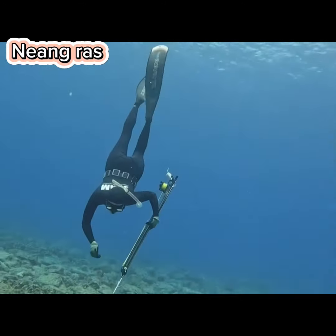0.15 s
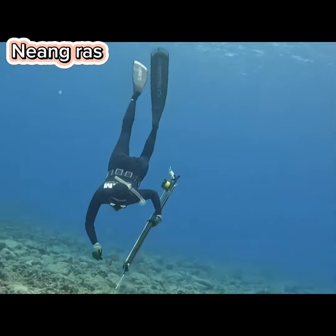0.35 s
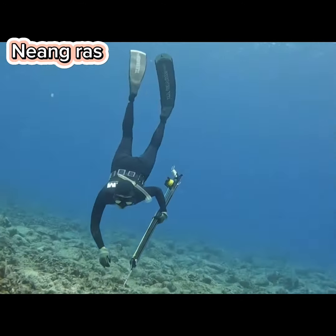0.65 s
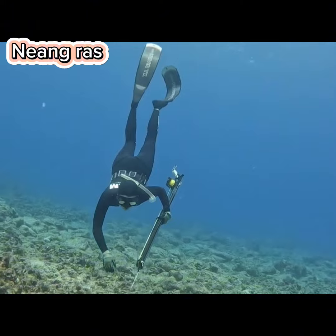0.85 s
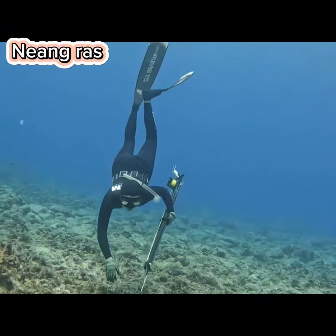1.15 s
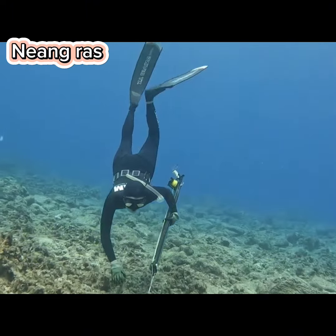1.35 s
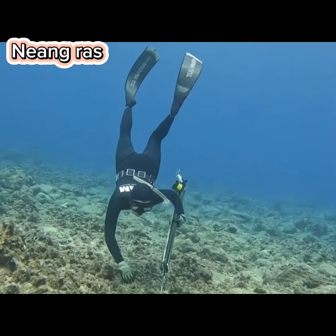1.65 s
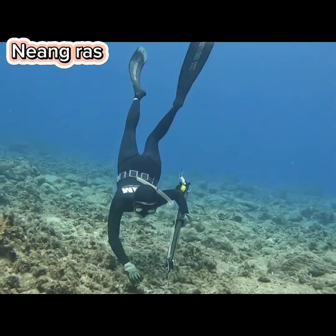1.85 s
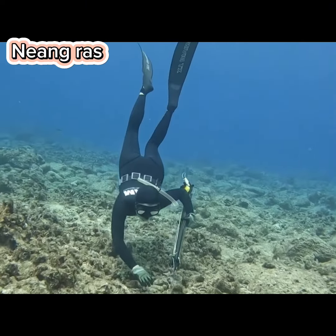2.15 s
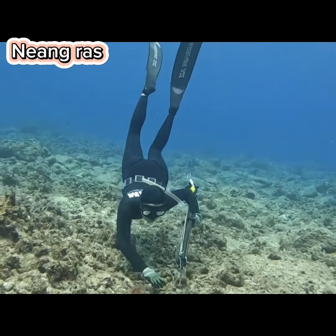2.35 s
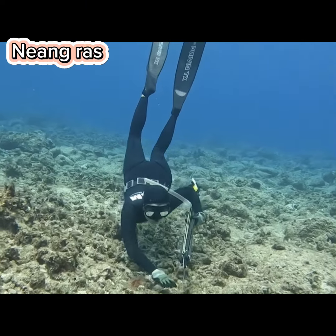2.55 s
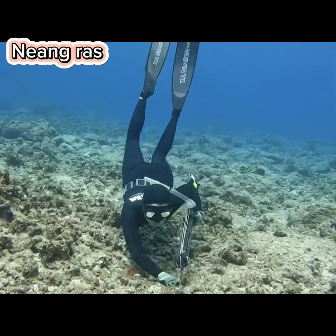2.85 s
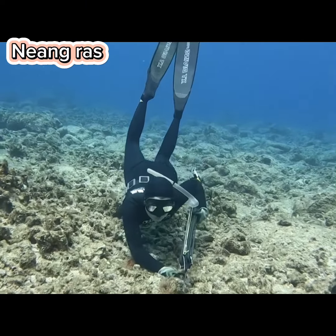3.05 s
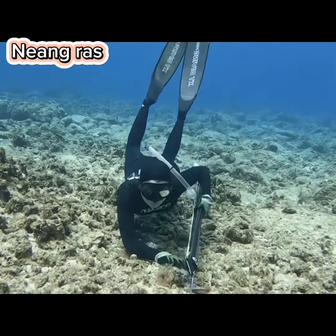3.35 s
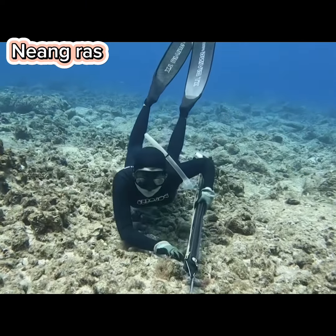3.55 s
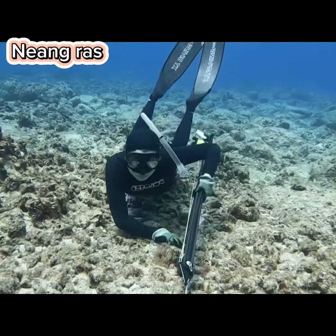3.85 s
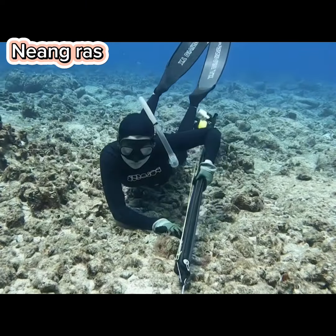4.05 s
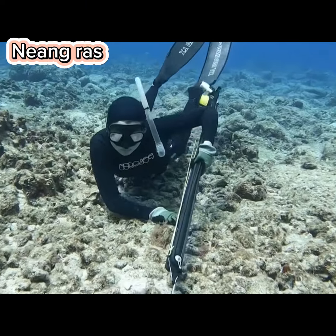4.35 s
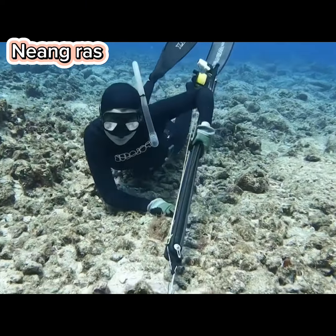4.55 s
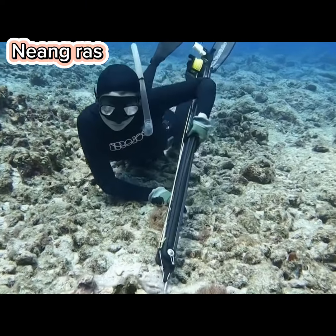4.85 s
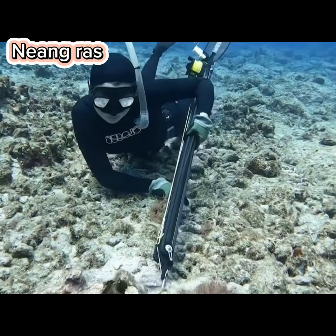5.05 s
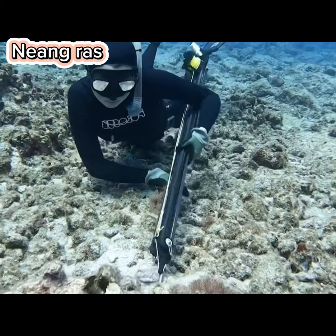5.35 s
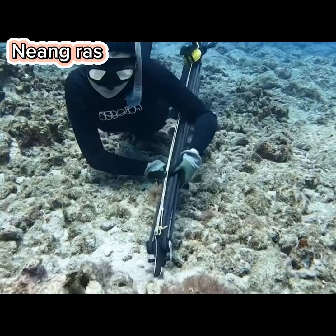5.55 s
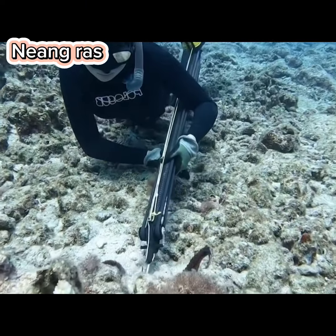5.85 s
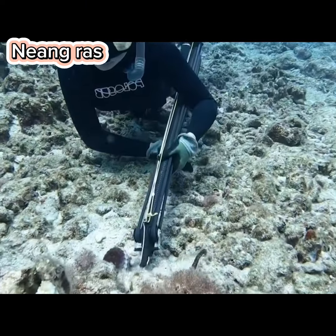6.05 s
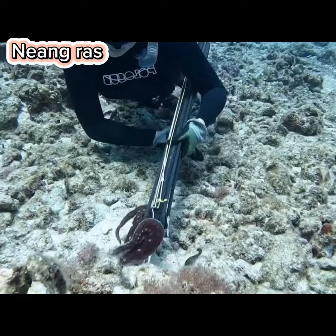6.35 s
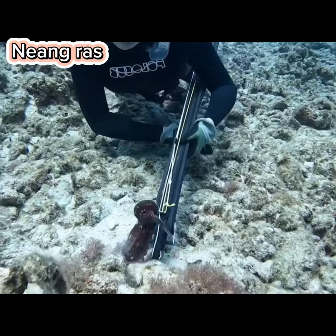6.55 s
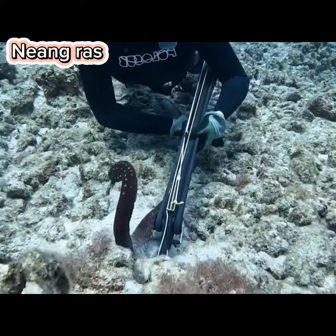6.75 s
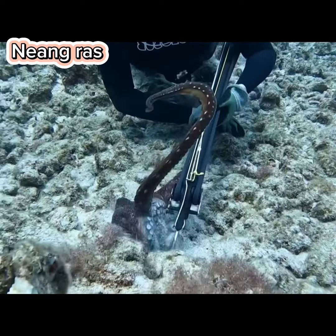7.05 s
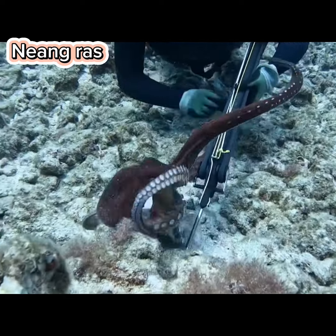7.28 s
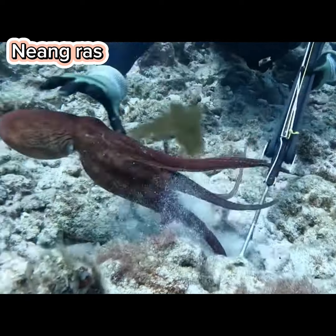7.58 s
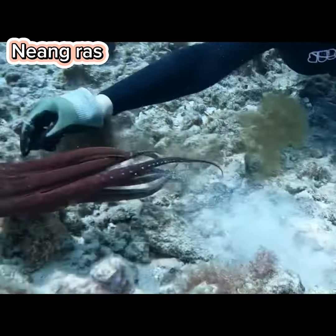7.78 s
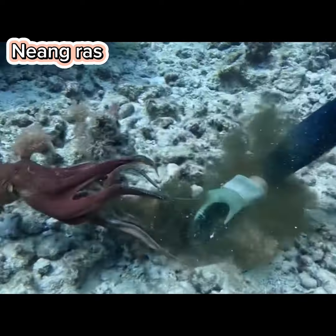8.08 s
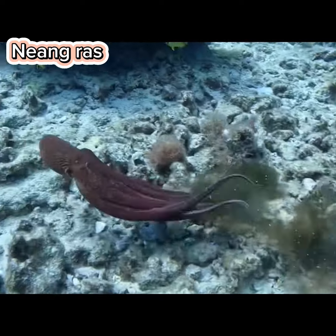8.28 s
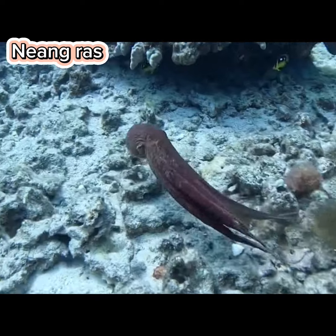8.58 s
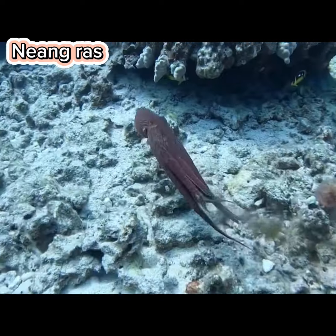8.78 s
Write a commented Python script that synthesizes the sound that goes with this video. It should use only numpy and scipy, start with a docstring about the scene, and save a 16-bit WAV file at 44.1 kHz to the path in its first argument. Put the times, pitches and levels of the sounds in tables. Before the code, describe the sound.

Underwater on a reef, heard from inside a waterproof camera housing. Snapping shrimp fry and crackle throughout, with sharper single snaps nearby. Low water rumble slowly grows, with dull taps and soft gulps on the case. A hard click comes near the middle, then a deep thump. Toward the end, finger scuffs and rattling knocks cluster, water surges, and the hardest knock lands before things ease.

```python
"""Snapping shrimp and a handled camera housing

A diver carries a camera in a waterproof housing over a reef, swinging it after a fleeing octopus.
Water buffets, churns and gulps against the case: filtered noise, ragged clicks and short low cycles.
The hand taps, rubs, scuffs and knocks on it: gritty noise coloured by the housing's resonances.
Shrimp crackle all around: noise bursts shaped by a path over the seabed, each ringing the housing."""
import sys
import numpy as np
from scipy import signal
from scipy.fft import rfft, irfft
from scipy.io import wavfile
from scipy.ndimage import uniform_filter1d

SR = 44100
rng = np.random.default_rng(int(sys.argv[2]) if len(sys.argv) > 2 else 0)


def master_out(mix):
    """Clip the mix to full scale and print it as 16-bit PCM to the path in sys.argv[1]."""
    frames = np.transpose(np.atleast_2d(mix))
    ceiling = np.clip(frames, -1, 1)
    pcm = np.round(ceiling * 32767).astype(np.int16)
    wavfile.write(sys.argv[1], SR, pcm)


N = 393372
TIME = np.arange(N) / SR

# Resonances of the housing. Each row: centre in Hz, width in Hz, lift in dB at full ring depth.
HOUSING_MODES = [(505, 154, 11.5), (757.6, 96, 15), (1046, 111, 17), (1337, 130, 10.5), (1546, 118, 17.5),
                 (1743, 91, 11.5), (2310, 150, 17), (2784, 182, 12.5), (3066, 237, 13.5), (3730, 520, 13.5),
                 (4827, 170, 12), (5295, 1160, 13), (6630, 420, 9), (7460, 760, 11)]
# Spectrum of the slow buffeting. Each row: frequency in Hz, level in dB.
BUFFET_SPECTRUM = [(5, -17.5), (15, 4), (30, -7.5), (50, -13.5), (80, -19.5), (130, -26), (250, -61.5),
                   (600, -96)]
# Spectrum of the low churning. Each row: frequency in Hz, level in dB.
CHURN_SPECTRUM = [(40, -11), (90, 4), (150, -0.5), (225, -0.5), (300, -12), (420, -16.5), (900, -29.5),
                  (3000, -81)]
# Spectrum of rubbing on the housing. Each row: frequency in Hz, level in dB.
RUB_SPECTRUM = [(120, -20), (280, 10), (420, -9.5), (700, 0), (1100, -12), (1500, -8), (2300, -8.5),
                (2950, -4.5), (3600, -16.5), (8000, -34), (15000, -79)]
# Spectrum of dull taps on the case. Each row: frequency in Hz, level in dB.
TAP_SPECTRUM = [(40, -4.5), (130, 2.5), (230, -3), (400, -23), (750, -23.5), (1500, -26), (3000, -35.5),
                (8000, -55)]
# Spectrum of shrimp snaps. Each row: frequency in Hz, level in dB.
SNAP_SPECTRUM = [(150, -26.5), (500, -31.5), (900, -17.5), (1500, -7.5), (2200, -8), (2800, -1),
                 (4200, -10), (5500, -12), (7600, -15.5), (8400, -21), (10300, -14), (11700, -22.5),
                 (14000, -17), (15700, -44)]
# Swings of the camera that make the flow surge.
# Each row: crest in seconds, added level in dB, seconds to fade by 1/e on either side.
CAMERA_SWINGS = [(5.653, 0, 0.24), (8.03, 8.5, 0.6)]
# Strongest pushes of water on the case, and at 8.329 and 8.332 s the low push and thud under the knocks. Each
# row: crest in seconds, peak level in dB, pitch in Hz.
LOW_PUSHES = [(0.535, -45, 216), (1.134, -36.5, 115), (1.404, -46, 215), (1.567, -46, 176),
              (2.227, -55, 216), (2.261, -48, 217), (2.438, -23.5, 91), (2.49, -37.5, 180),
              (2.742, -37, 300), (3.388, -33, 228), (3.948, -35.5, 271), (4.827, -32.5, 113),
              (4.974, -28, 267), (5.628, -30.5, 286), (5.685, -35, 304), (5.793, -37, 256),
              (5.823, -38, 221), (5.867, -6.5, 166), (5.88, -29, 228), (5.924, -43, 242),
              (6.197, -39, 259), (6.374, -35.5, 245), (6.92, -38, 270), (7.201, -34, 255),
              (7.518, -35, 203), (7.631, -32, 211), (7.884, -42, 173), (8.329, -17, 74.5),
              (8.332, -14.5, 207), (8.673, -30, 218)]
# Dull taps on the case. Each row: crest of the push in seconds, peak level in dB.
CASE_TAPS = [(0.109, -40.5), (0.389, -39), (0.536, -39), (0.612, -39.5), (0.927, -37.5), (1.177, -35),
             (1.572, -43), (2.487, -35), (2.92, -39.5), (3.075, -42.5), (3.334, -38.5), (3.493, -37.5),
             (3.594, -36), (3.858, -34), (6.245, -38.5), (6.584, -43)]
# Strokes of the hand along the housing.
# Each row: crest in seconds, rms level in dB, seconds to fade by 1/e on either side.
HAND_STROKES = [(4.87, -44.5, 0.099), (5.655, -49.5, 0.1), (5.93, -70, 0.027), (6.28, -57, 0.18),
                (7.53, -44.5, 0.2), (8.22, -46.5, 0.13), (8.36, -35.5, 0.018), (8.82, -49, 0.041)]
# Clearest finger scuffs. Each row: crest in seconds, rms level at the crest in dB, strongest Hz.
FINGER_SCUFFS = [(1.967, -53, 1100), (2.056, -51.5, 1550), (2.672, -54, 780), (3.861, -56, 790),
                 (4.169, -47.5, 1480), (4.19, -51.5, 755), (4.271, -49, 1550), (4.377, -50.5, 760),
                 (4.436, -50.5, 1570), (4.679, -43, 810), (4.696, -48, 1450), (4.925, -48, 780),
                 (5.311, -47, 800), (5.648, -47.5, 620), (5.684, -51, 530), (5.82, -49.5, 620),
                 (5.942, -58, 750), (6.4, -54, 1380), (6.708, -47, 960), (6.914, -52.5, 1460),
                 (7.212, -44, 794), (7.344, -49, 1520), (7.386, -44, 1510), (7.475, -46, 760),
                 (7.697, -43.5, 1300), (7.84, -45, 1540), (8.227, -44, 646), (8.396, -44, 750),
                 (8.834, -48.5, 1050)]
# Knocks on the housing. Each row: release in seconds, peak level of the body in dB,
# build-up in seconds, 60 dB decay in seconds, strongest Hz.
HOUSING_KNOCKS = [(4.848, -35, 0.0086, 0.022, 1500), (4.861, -26.5, 0.016, 0.018, 2770),
                  (4.8695, -11, 0.0015, 0.014, 2780), (4.881, -32, .0015, .025, 2850),
                  (6.0268, -30.5, .0005, 0.029, 1460), (7.508, -26.5, 0.013, 0.059, 760),
                  (7.533, -23.5, .001, 0.039, 760), (7.537, -26, 0.002, 0.062, 1450),
                  (7.575, -29.5, 0.0058, 0.17, 3000), (7.624, -26.5, 0.0025, 0.023, 3020),
                  (7.631, -26.5, .002, 0.039, 3220), (7.633, -28, 0.0027, 0.018, 1500),
                  (7.656, -31.5, .0015, .014, 2830), (7.737, -33, .001, 0.08, 756),
                  (7.872, -35, 0.0017, 0.065, 735), (8.324, -17.5, 0.001, 0.016, 4030),
                  (8.327, -19, 0.0019, 0.041, 850), (8.333, -23, .002, 0.044, 2300),
                  (8.346, -10.5, 0.0014, 0.017, 2440), (8.355, -19, .002, .036, 2800),
                  (8.366, -34, .002, 0.047, 2750), (8.386, -35, .006, .06, 2360)]
# Nearest shrimp snaps. Each row: start in seconds, peak level in dB before the gain, strongest Hz.
SHRIMP_SNAPS = [(0.5833, -33, 3020), (0.825, -38, 3300), (1.1393, -28, 2950), (1.334, -32.5, 3230),
                (1.5696, -34, 3800), (1.6156, -29, 6470), (1.8554, -29.5, 3130), (2.6117, -34, 3060),
                (2.8074, -19.5, 3870), (2.8742, -25, 3120), (2.897, -30.5, 2200), (3.3078, -20, 2540),
                (3.384, -31, 3470), (3.466, -31.5, 2900), (3.9386, -26, 3000), (4.1712, -31.5, 2850),
                (4.753, -25.5, 4050), (4.99, -32, 3570), (5.1337, -32, 3640), (5.1435, -27.5, 3160),
                (5.3075, -30.5, 2840), (5.416, -26.5, 2560), (5.8197, -32, 2830), (6.2004, -24.5, 2900),
                (6.9361, -32.5, 2930), (7.205, -28.5, 2870), (7.9355, -36, 2750), (7.9783, -33.5, 2780),
                (8.0013, -26, 3300), (8.709, -36.5, 3400), (8.727, -37, 2920), (8.747, -38, 2750),
                (8.8667, -41, 5270)]

# the flow grows slowly as the camera follows the diver down; the rumble lags behind the churning
DRIFT_DB_PER_S, RUMBLE_LAG_S = 1.0173, 0.2
# levels at the start, and the share of the flow's growth that the churning follows
BUFFET_DB, CHURN_DB, CHURN_SHARE = -41, -60, 0.96
# snaps from further off: mean (before the limit) and greatest level above the faintest
COLONY_SPREAD_DB, COLONY_LIMIT_DB = 3.5, 13.5
# cycles in the 60 dB decay of a -35 dB gulp; every so many dB more halve it
GULP_CYCLES, GULP_HALVING_DB = 13.6, 11.5
# slosh of a full-scale gulp, growing half as fast as the gulp in dB; its 1/e fade on either side
SLOSH_DB, SLOSH_S = -28.5, 0.022
GRIP_DB = -73.5  # the resting hand
# crack of contact against a knock's body: at 2900 Hz, and more for higher knocks
CRACK_DB, CRACK_DB_PER_OCTAVE = -35, 26.5
# soft ring: time of its crest, peak level, pitch at the crest, decay and sag
RING_S, RING_DB, RING_HZ, RING_T60_S, RING_SAG_OCTAVES_PER_S = 8.427, -46.5, 1070, 0.12, 2.6
# snap gain, and the level of a short noise swell before each snap,
# which does not follow the snap's table level
SNAP_GAIN_DB, SNAP_LEAD_DB = 0.5, -62.5
# a snap's treble against its body at 2900 Hz and -30 dB: more if it rings higher, less if louder
TREBLE_DB, TREBLE_DB_PER_OCTAVE, TREBLE_DB_PER_DB = -20.5, 18, -0.84
TOP_HZ = 15700  # upper edge of the camera's sound


def undb(db):
    """Decibels to gain."""
    return 10 ** (np.asarray(db) / 20)


def unit(x):
    """Scale to rms 1."""
    return x / np.sqrt(np.mean(x ** 2))


def add(out, s, x):
    """Mix a short sound in at s seconds."""
    i = max(int(s * SR), 0)
    out[i:i + len(x)] += x[:max(N - i, 0)]


def walk(rate):
    """Random levels held for 1 / rate seconds and slewed twice; spread near 1."""
    hold = max(int(SR / rate), 2)
    steps = np.repeat(rng.standard_normal(N // hold + 1), hold)
    return 1.36 * uniform_filter1d(uniform_filter1d(steps, hold), hold)[:N]


def fade(t, t60):
    """Decay by 60 dB in t60 seconds."""
    return np.exp(-np.log(1000) * np.maximum(t, 0) / t60)


def band(x, lo, hi):
    """Causal band-pass."""
    return signal.sosfilt(signal.butter(3, [lo, hi], "band", fs=SR, output="sos"), x)


def colour(x, points, ring=0, focus_hz=1000, focus_db=0, octaves=0.29, size=16384):
    """Causal filter: a smooth spectrum, the housing's resonances (depth ring) and one broad emphasis."""
    f = np.maximum(np.arange(size // 2 + 1) * SR / size, 1)
    hz, level_db = np.transpose(points)
    db = np.interp(np.log(f), np.log(hz), level_db)
    db = db + focus_db * np.exp(-.5 * (np.log2(f / focus_hz) / octaves) ** 2)
    if ring:
        db = db + ring * sum(lift / (1 + (2 * (f - centre) / width) ** 2)
                             for centre, width, lift in HOUSING_MODES)
    # folding the cepstrum gives minimum phase, so no sound comes before its cause
    cepstrum = irfft(np.log(undb(db)))
    cepstrum[1:size // 2] *= 2
    cepstrum[size // 2 + 1:] = 0
    impulse = irfft(np.exp(rfft(cepstrum)))
    return signal.oaconvolve(x, impulse)[:len(x)]


def clicks(rate, spread_db, limit_db):
    """Impulses of either sign at random times, rate per second: many small, a few large."""
    hit = rng.random(N) < rate / SR
    sign = np.sign(rng.standard_normal(N))
    return hit * sign * undb(np.minimum(spread_db * rng.standard_exponential(N), limit_db))


def grit(count, grain):
    """Stick and slip: noise in catches of very uneven size, the sparser the higher the grain."""
    catches = np.repeat(rng.random(count // 24 + 1), 24)[:count]
    return rng.standard_normal(count) * catches ** grain


def seabed(gather_s, near_t60, far_db, far_t60):
    """Path of a snap: short detours over rubble gather and die, with a faint, longer wash from the reef."""
    t = np.arange(SR // 8) / SR
    gather = 1 - np.exp(-t / gather_s)
    near = rng.standard_normal(len(t)) * fade(t, near_t60) * gather
    far = rng.standard_normal(len(t)) * fade(t, far_t60) * gather
    return near / np.linalg.norm(near) + undb(far_db) * far / np.linalg.norm(far)


def flow(t):
    """Strength of the flow past the case in dB at times t: a slow drift plus the swings' surges."""
    surges = sum(db * np.exp(-((t - s) / length) ** 2) for s, db, length in CAMERA_SWINGS)
    return DRIFT_DB_PER_S * t + surges


def water():
    """Eddies buffet the case with a surging rumble, churn in low bursts and gurgle in the housing's ring."""
    rumble = unit(colour(rng.standard_normal(N), BUFFET_SPECTRUM) * undb(2.7 * walk(18)))
    buffet = rumble * undb(BUFFET_DB + flow(TIME - RUMBLE_LAG_S))
    eddies = clicks(rate=170, spread_db=4.5, limit_db=11.5) * undb(4.9 * walk(25))
    churn = unit(colour(eddies, CHURN_SPECTRUM))
    burst_db = np.clip(7 * walk(33) + 6.7 * walk(7), -20, 12)
    bursts = clicks(rate=400, spread_db=2.0, limit_db=18) * undb(burst_db)
    gurgle = unit(colour(bursts, RUB_SPECTRUM, ring=0.3, focus_hz=606, focus_db=5.5, octaves=0.53))
    return buffet + (churn + undb(-13) * gurgle) * undb(CHURN_DB + CHURN_SHARE * flow(TIME))


def shrimp_bed():
    """Colony patches crackle, each with its own path and colour, over the frying of dense distant snaps."""
    crackle = np.zeros(N)
    for hz in np.geomspace(1900, 7200, 60):  # 60 patches
        path = seabed(gather_s=.001, near_t60=.009, far_db=-7, far_t60=.08)
        path = colour(path, SNAP_SPECTRUM, ring=rng.random(), focus_hz=hz, focus_db=10, size=2048)
        path = unit(band(path, 300, 8000))
        for when, chance in rng.random((22, 2)):  # 22 snaps from each patch
            level_db = min(-COLONY_SPREAD_DB * np.log(chance), COLONY_LIMIT_DB)
            add(crackle, when * N / SR, path * undb(level_db))
    distant = colour(clicks(rate=4000, spread_db=4, limit_db=-0.5), SNAP_SPECTRUM, ring=0.6)
    # four bands of the frying swell and flicker on their own
    frying = np.zeros(N)
    for lo, hi in [(300, 1730), (2000, 4220), (4400, 7860), (8400, 13560)]:
        frying += band(distant, lo, hi) * undb(2.43 * walk(35) + 0.32 * walk(6.8))
    return undb(-57.0) * unit(crackle * undb(3.4 * walk(14))) + undb(-56) * unit(frying)


def gulps():
    """Soft pressure pushes on the case, from water or under a knock: a few low cycles swell and die, in a
    ragged slosh."""
    out, lead_s = np.zeros(N), .03
    t = np.arange(SR // 5) / SR - lead_s
    for s, db, hz in LOW_PUSHES:
        t60 = GULP_CYCLES / hz * 2 ** (-(db + 35) / GULP_HALVING_DB)  # harder pushes die sooner
        swell = np.where(t < 0, np.exp(-(t * hz / 0.79) ** 2), fade(t, t60))
        swell = uniform_filter1d(swell, int(.4 * SR / hz))
        push = swell / swell.max() * np.cos(2 * np.pi * hz * t)
        slosh = unit(band(rng.standard_normal(len(t)), hz / 2, hz * 1.12)) * np.exp(-np.abs(t) / SLOSH_S)
        add(out, s - lead_s, undb(db) * push + undb(SLOSH_DB + db / 2) * slosh)
    return out


def taps():
    """Dull, gritty taps on the case: a low bump with a little of the housing's ring."""
    out, lead_s = np.zeros(N), .03
    t = np.arange(SR // 8) / SR - lead_s
    push = np.where(t < 0, np.exp(-(t / 0.0084) ** 2), fade(t, 0.089))
    for s, db in CASE_TAPS:
        x = colour(push * grit(len(t), grain=3.2), TAP_SPECTRUM, ring=0.78, size=4096)
        add(out, s - lead_s, undb(db) * x / np.abs(x).max())
    return out


def rubbing():
    """The hand slips over the housing in uneven runs of tiny catches; each stroke swells and fades."""
    slips = clicks(rate=1000, spread_db=1.0, limit_db=7) * undb(np.clip(6 * walk(45), -9, 4))
    strokes = sum(undb(db) * np.exp(-np.abs(TIME - s) / length) for s, db, length in HAND_STROKES)
    return (undb(GRIP_DB) + strokes) * unit(colour(slips, RUB_SPECTRUM, ring=0.81))


def scuffs():
    """A fingertip shifts: a short grainy swell that favours one part of the housing's ring."""
    out, lead_s = np.zeros(N), .04
    t = np.arange(SR // 6) / SR - lead_s
    swell = np.where(t < 0, np.exp(-(t / 0.01) ** 2), fade(t, 0.1))
    for s, db, hz in FINGER_SCUFFS:
        x = colour(swell * grit(len(t), grain=2.7), RUB_SPECTRUM, ring=0.86, focus_hz=hz,
                   focus_db=13.0, octaves=0.19, size=4096)
        crest = np.sqrt(uniform_filter1d(x ** 2, size=800).max())
        add(out, s - lead_s - .003, undb(db) * x / crest)  # placed 3 ms early
    return out


def knocks():
    """Friction builds up, lets go with a knock and chatters out in the housing."""
    out, lead_s = np.zeros(N), .05
    t = np.arange(SR // 5) / SR - lead_s
    for s, db, rise, t60, hz in HOUSING_KNOCKS:
        build_up = 0.62 * np.exp(-np.abs(t) / rise)
        chatter = fade(t, t60) + 0.033 * fade(t, 0.051)
        force = np.where(t < 0, build_up, chatter)
        body = colour(force * grit(len(t), grain=0.31), RUB_SPECTRUM, ring=0.75, focus_hz=hz,
                      focus_db=14.5, octaves=0.25, size=4096)
        crack = band(force * rng.standard_normal(len(t)), 4000, 9500)
        crack_db = CRACK_DB + CRACK_DB_PER_OCTAVE * np.log2(hz / 2900)
        knock = body / np.abs(body).max() + undb(crack_db) * crack / np.abs(crack).max()
        add(out, s - lead_s, undb(db) * knock)
    return out


def ringing():
    """A soft ring swells after the hardest knock and sags in pitch as it dies."""
    t = TIME - RING_S
    hz = RING_HZ * 2 ** (-RING_SAG_OCTAVES_PER_S * np.clip(t, -RING_T60_S, RING_T60_S))
    swell = np.where(t < 0, np.exp(-(t / 0.015) ** 2), fade(t, RING_T60_S))
    return undb(RING_DB) * swell * np.sin(2 * np.pi * np.cumsum(hz) / SR)


def near_snaps():
    """Sharp snaps, each stressing its own part of the housing's ring."""
    out, lead = np.zeros(N), SR // 50
    for s, db, hz in SHRIMP_SNAPS:
        path = np.pad(seabed(gather_s=0.0004, near_t60=0.0089, far_db=-6.0, far_t60=0.12), (lead, 0))
        path[lead] += .6  # the direct crack
        swell = fade(np.arange(lead, 0, -1) / SR, 0.05)  # short noise swell before the snap
        path[:lead] += undb(SNAP_LEAD_DB - db) * rng.standard_normal(lead) * swell
        x = colour(path, SNAP_SPECTRUM, ring=0.59, focus_hz=hz, focus_db=10.0, size=2048)
        body, treble = unit(band(x, 400, 6000)), unit(band(x, 6000, 15000))
        treble_db = TREBLE_DB + TREBLE_DB_PER_OCTAVE * np.log2(hz / 2900) + TREBLE_DB_PER_DB * (db + 30)
        snap = body + undb(treble_db) * treble
        add(out, s - lead / SR, undb(db + SNAP_GAIN_DB) * snap / np.abs(snap).max())
    return out


def scene():
    """Everything reaches one microphone through the housing."""
    background = water() + shrimp_bed()
    handling = taps() + rubbing() + scuffs() + knocks() + ringing()
    return (background + gulps() + handling + near_snaps())[None]


def record(dry):
    """The camera cuts the top with a steep low-pass."""
    return signal.sosfilt(signal.ellip(10, .2, 80, TOP_HZ, fs=SR, output="sos"), dry)


dry = scene()
out = record(dry)
master_out(out)
```